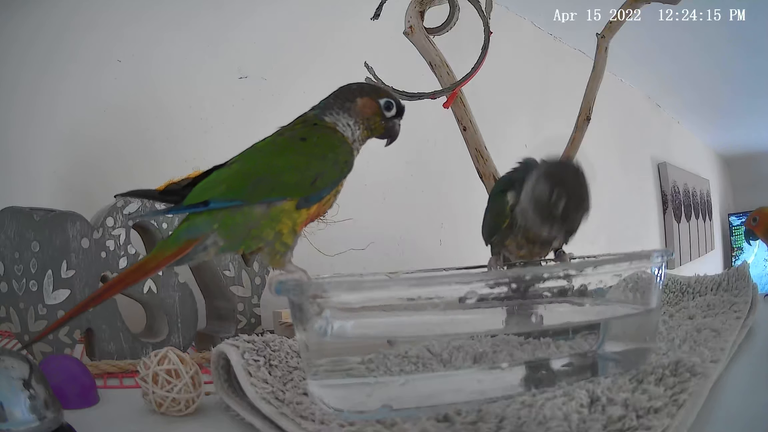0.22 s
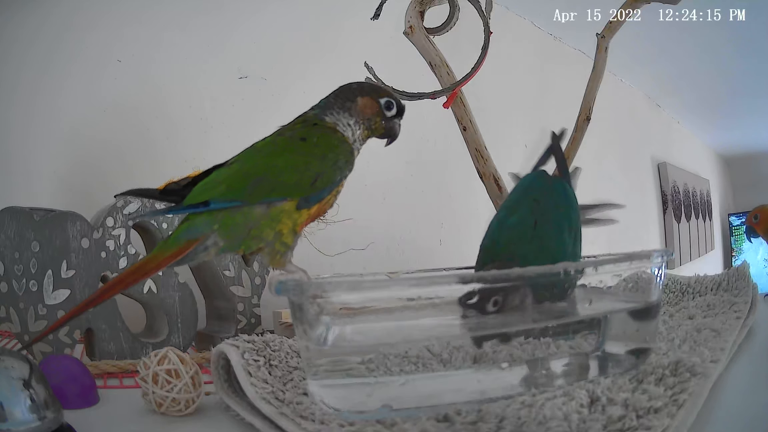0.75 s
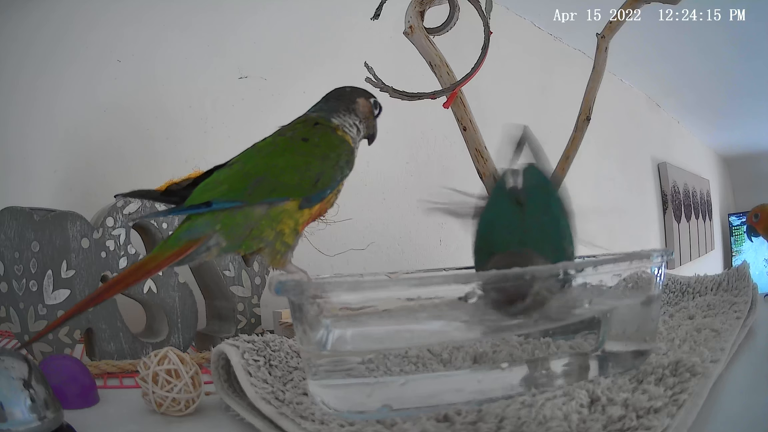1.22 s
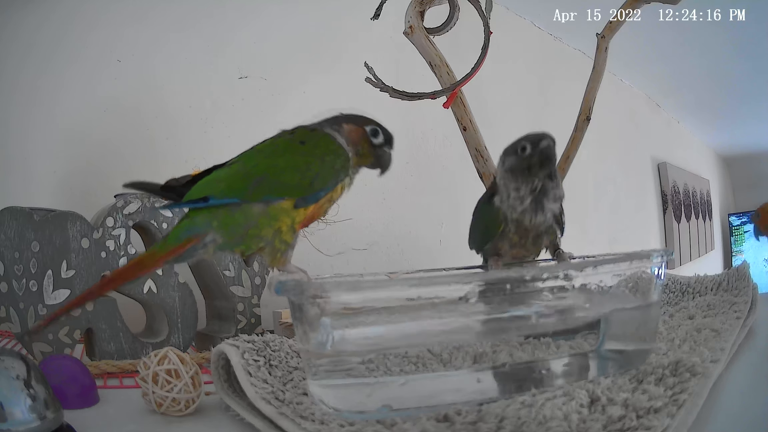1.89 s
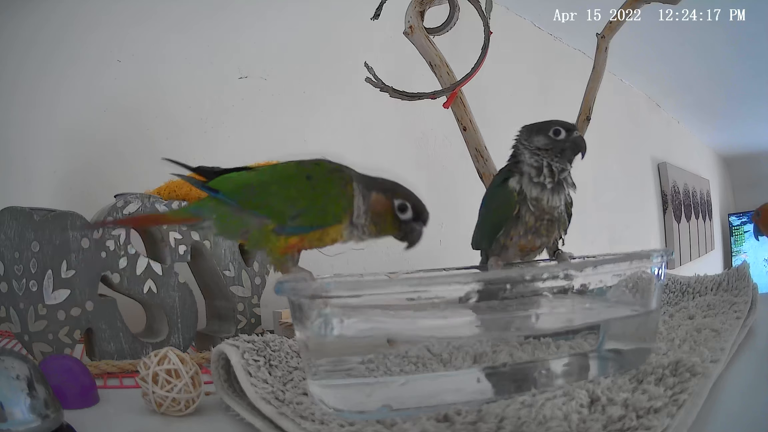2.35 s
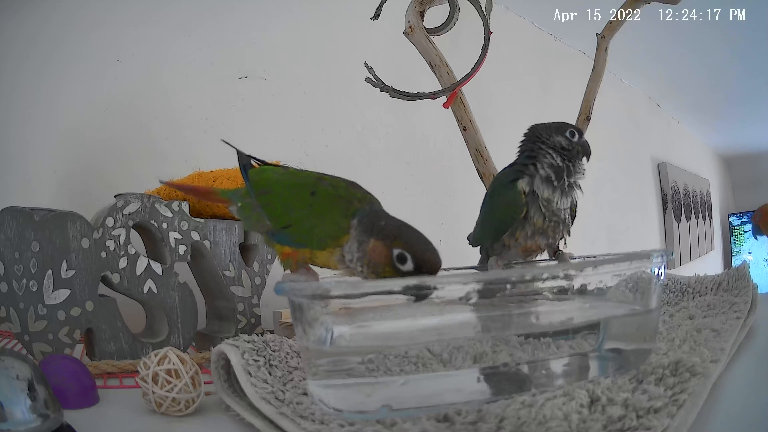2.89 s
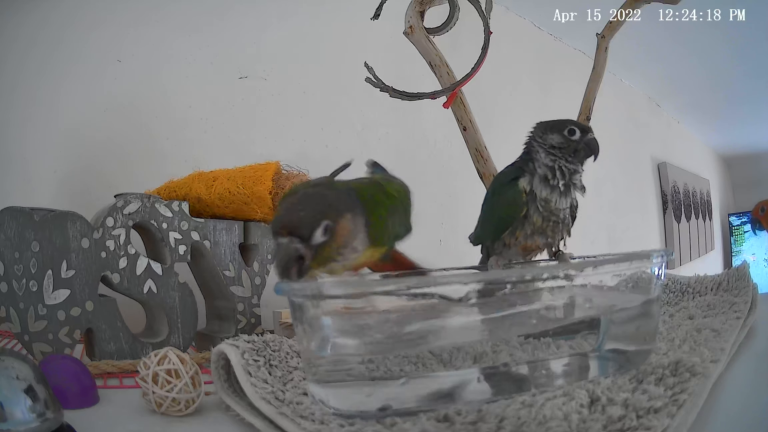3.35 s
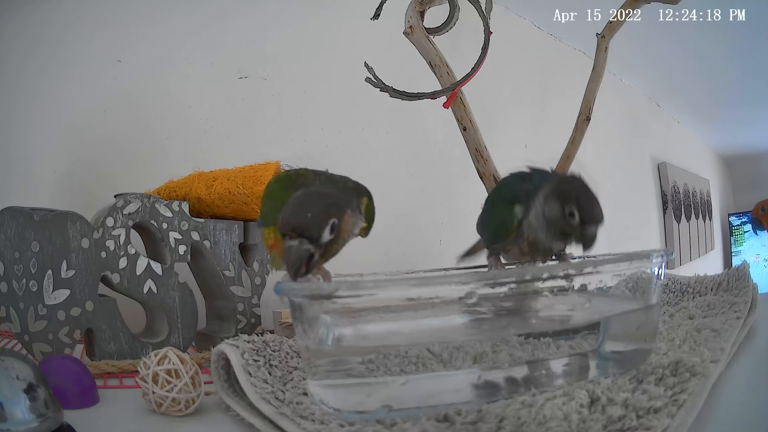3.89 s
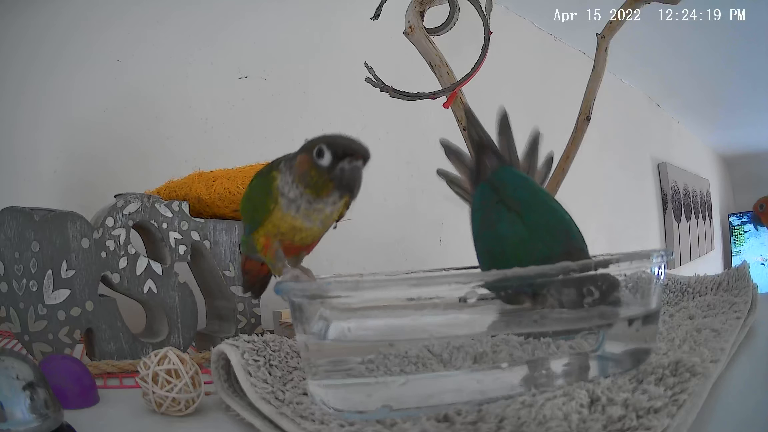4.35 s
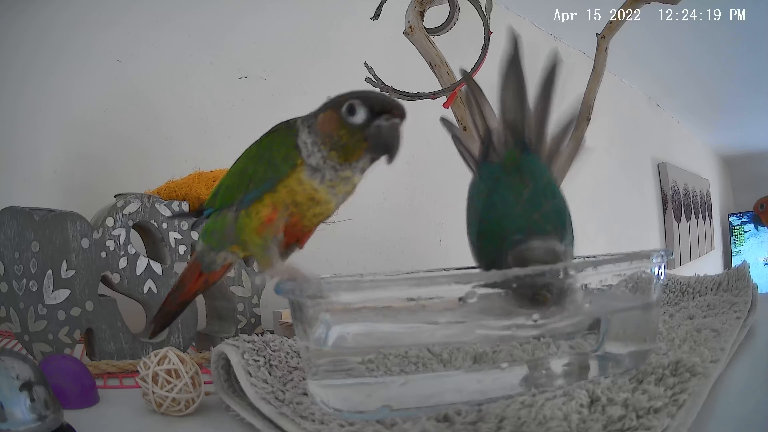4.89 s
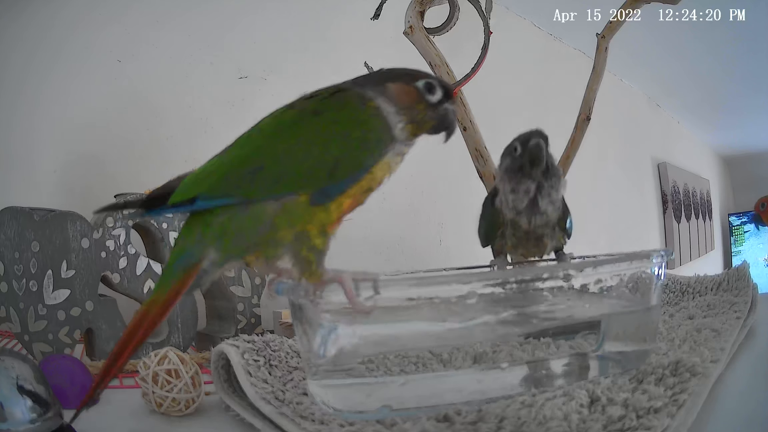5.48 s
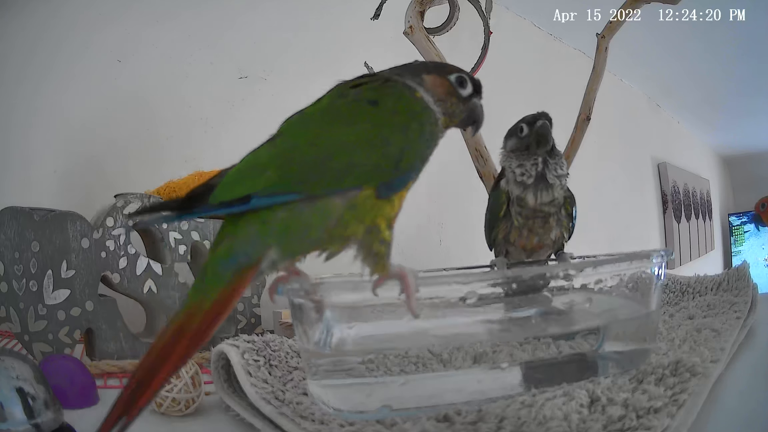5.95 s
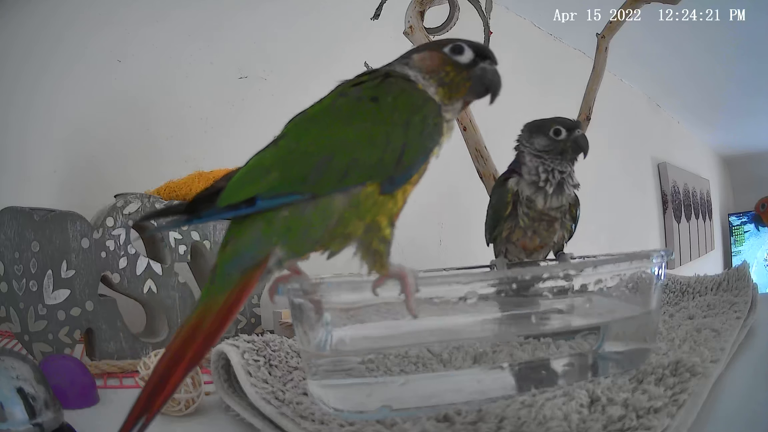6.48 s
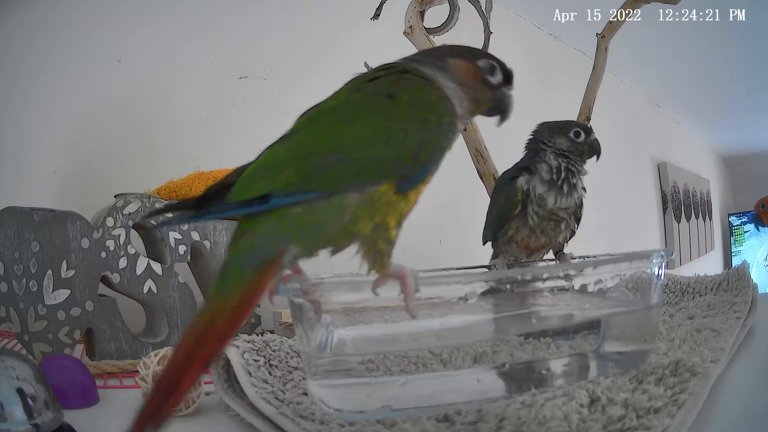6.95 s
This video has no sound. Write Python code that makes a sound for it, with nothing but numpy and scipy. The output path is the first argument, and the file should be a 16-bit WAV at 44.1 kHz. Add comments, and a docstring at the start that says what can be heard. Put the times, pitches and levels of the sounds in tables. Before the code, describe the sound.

Two small parrots bathe in a glass dish: rapid buzzing wing-shake bursts, bubbly water fizz, glassy claw tinks and one short hoarse rasp in a quiet room.

```python
"""A soft hiss and a low rumble lie under a quiet room; then a squelch, and two small parrots bathe in a glass dish.
One shakes its wet head and wings in bursts of about 47 to 60 strokes a second, built from rustling and whistling
noise, and rummages in the water between them: crackle and tiny ringing bubbles. Claws and beaks tink on the dish
as decaying modes. The other bird gives one short hoarse rasp: rough noise in moving throat resonances."""
import sys
import numpy as np
from scipy import signal
from scipy.fft import rfft, irfft, next_fast_len
from scipy.io import wavfile

SR = 44100
rng = np.random.default_rng(int(sys.argv[2]) if len(sys.argv) > 2 else 0)


def dump(signal):
    """Clip the signal to [-1, 1] and save it as 16-bit WAV at the path in sys.argv[1]."""
    limited = np.clip(np.atleast_2d(signal).T, -1, 1)
    pcm = np.round(limited * 32767).astype(np.int16)
    wavfile.write(sys.argv[1], SR, pcm)


N = 317961
TIME = np.arange(N) / SR
STROKE_TIME = np.arange(4096) / SR - .02  # seconds; 0 is the middle of the stroke
MIC_TOP_HZ, CUTOFF_HZ = 6620, 16000

# bright spectrum of fine water fizz, also of a claw's skid: pitch_hz [Hz], relative level_db [dB]
FIZZ = [(2000, -18), (3200, -7.5), (4200, 1), (5500, 7), (6300, -2.5), (6700, -8)]


def from_db(db):
    """Decibels to gain."""
    return 10 ** (np.asarray(db) / 20)


def rms_one(x):
    """Scale to unit rms."""
    return x / np.sqrt(np.mean(x ** 2) + 1e-20)


def add(out, start_s, sound):
    """Mix a sound in at a time."""
    i = int(start_s * SR)
    out[i:i + len(sound)] += sound[:N - i]


def cut(x, hz, kind, order=2):
    """Butterworth filter."""
    return signal.sosfilt(signal.butter(order, hz, kind, fs=SR, output="sos"), x)


def shaped(x, gain_at):
    """Colour a steady sound by a gain over frequency, with nothing above the microphone's range; rms 1."""
    size = next_fast_len(len(x))
    hz = np.maximum(np.arange(size // 2 + 1) * SR / size, 1)
    spectrum = rfft(x, size) * gain_at(hz) * (hz < MIC_TOP_HZ + 200)
    return rms_one(irfft(spectrum, size)[:len(x)])


def coloured(x, points):
    """Colour a steady sound by a spectrum drawn through points; rms 1."""
    at, level = np.transpose(points)
    return shaped(x, lambda hz: from_db(np.interp(np.log(hz), np.log(at), level)))


def resonance(hz, centre, width):
    """Complex response of one resonance, 1 on top."""
    return 1 / (1 + 1j * (hz ** 2 - centre ** 2) / (hz * width))


def crackle(size, per_s, spread_db, smooth):
    """Tiny droplet and barb clicks of uneven size over a smooth hiss."""
    hits = rng.random(size) < per_s / SR
    signs = rng.choice([-1, 1], size)
    strength = from_db(spread_db * np.minimum(rng.exponential(1, size), 4))
    return rms_one(rms_one(hits * signs * strength) + smooth * rng.standard_normal(size))


def swell(t, length, tail_db, tail_s):
    """A rounded push centred on t = 0, then a tail that dies away."""
    push = np.exp(-np.abs(2 * t / length) ** 3)
    tail = from_db(tail_db) * np.exp(-np.abs(t) / np.where(t > 0, tail_s, length / 2))
    return np.hypot(push, tail)


def burst(carrier, envelope, length):
    """Shape a carrier so that it has unit power over the given length."""
    sound = carrier * envelope
    return sound * np.sqrt(length * SR / np.sum(sound ** 2))


def whistle(size, centre_hz, width_hz, steady):
    """Noise in a narrow resonance, its strength partly evened out."""
    # the resonance is applied twice, which narrows it, so each is made wider
    tone = shaped(rng.standard_normal(size), lambda hz: resonance(hz, centre_hz, 1.3 * width_hz) ** 2)
    strength = np.abs(signal.hilbert(tone))
    return rms_one(tone / (strength + 0.6) ** steady)


def background():
    """Steady coloured hiss and a low noise rumble whose level wanders."""
    # spectrum of the hiss: pitch_hz [Hz], relative level_db [dB]
    hiss_spectrum = [(8.8, -41.5), (15, -12), (54, -3), (81, -15), (154, -13.5), (198, -18.5), (263, -20),
                     (314, -20.5), (538, -23), (611, -26.5), (677, -26), (1220, -27.5), (1500, -29.5),
                     (4970, -31), (6760, -32.5), (8790, -60.5), (14900, -120)]
    # level of the rumble before a 0.5 dB lift: time_s [s], level_db [dB]
    rumble_curve = [(0.0, -66.5), (1.06, -64.5), (1.2, -52), (1.64, -58.5), (1.82, -51), (2.4, -66.5),
                    (5.43, -56.5), (5.52, -65.5), (6.19, -54), (6.42, -68), (6.94, -55.5), (7.2, -57.5)]
    rumble_spectrum = [(10, 0.5), (28, -1), (50, -4), (70, -18.5), (120, -28.0), (400, -59)]
    s, level_db = np.transpose(rumble_curve)
    rumble_level = from_db(np.interp(TIME, s, level_db) + 0.5)
    rumble = coloured(rng.standard_normal(N), rumble_spectrum)
    hiss = coloured(rng.standard_normal(N), hiss_spectrum)
    return from_db(-66) * hiss + rumble_level * rumble


def squelches_and_rings():
    """Short pitched squirts from wet plumage, and faint rings of the glass dish near 1.2 kHz, all of narrow noise."""
    # middle_s [s], length_s [s], level_db [dB], pitch_hz [Hz], nominal width_hz [Hz]
    pitched_rows = [(.485, 0.049, -56, 5040, 197), (0.626, 0.0075, -43, 1050, 400),
                    (0.641, 0.0082, -40.5, 1120, 298), (1.393, 0.014, -48, 1410, 248),
                    (1.435, .087, -56, 1220, 198), (1.474, 0.023, -51, 3300, 400),
                    (1.825, 0.027, -39.5, 4770, 700), (1.88, 0.0087, -42.5, 1020, 296),
                    (2.078, 0.034, -53, 985, 400), (4.412, 0.077, -38, 3050, 340),
                    (4.526, 0.053, -52, 3130, 500), (4.556, 0.049, -62, 2220, 294),
                    (4.981, 0.12, -53.5, 1240, 25.1), (5.025, .0082, -41.5, 3680, 503),
                    (5.251, 0.0066, -36.5, 3860, 497), (5.343, 0.013, -41, 5380, 406),
                    (7.1, 0.064, -56.5, 4060, 501)]
    out, t = np.zeros(N), np.arange(8192) / SR - .07
    for s, length, level_db, hz, width_hz in pitched_rows:
        tone = whistle(len(t), hz, width_hz, steady=0.27)
        envelope = swell(t, length, tail_db=-10.5, tail_s=0.0092)
        add(out, s + t[0], from_db(level_db) * burst(tone, envelope, length))
    return out


def shakes():
    """After a wind-up the strokes hold their force, then tire and slow; swish and rustle fade at their own rates."""
    # one shake a row: first_full_stroke_s [s], period_s [s], strokes [count], strokes_until_tired [count],
    # stroke_length_s [s], swish_db [dB], swish_fade_db [dB], swish_hz [Hz], nominal swish_width_hz [Hz],
    # rustle_db [dB], rustle_fade_db [dB]; fades are per unit of tiredness
    shake_rows = [(0.648, .0206, 7, 1.11, .0115, -18.5, 6, 5170, 701, -24, 3.5),
                  (1.1237, .0191, 7, 2.65, 0.011, -28, 6, 5300, 900, -33.5, 2.5),
                  (1.8998, .0207, 7, 2, 0.0091, -8.5, 8.5, 5328, 260, -24.5, 3.6),
                  (2.1025, .0168, 4, 2, .009, -9, 13.5, 5090, 1115, -26.5, 5.3),
                  (4.0227, .0206, 6, 2.6, 0.015, -48.5, 11.5, 5600, 1100, -42.5, 3.5),
                  (4.2455, .019, 6, 0.77, 0.0093, -16, 8, 5095, 748, -29, 3),
                  (4.8378, .0205, 5, 2, .008, -18, 14, 4930, 450, -26, 5),
                  (5.5087, .0211, 7, 1.77, .0098, -9.5, 8.5, 5290, 200, -26, 5),
                  (6.727, .0203, 7, 0.8, .008, -14.5, 7.5, 4980, 400, -23, 3.5)]
    # the bird's posture in each shake, same order: echo_delay_s [s], echo_share [0-1, held to 0.8],
    # tilt [dB per octave], hollow_hz [Hz], hollow_db [dB re rustle], ridge_hz [Hz], full-force ridge_db [dB]
    postures = [(0.001106, 0.81, 1.5, 1683, -16, 3610, 19.5), (0.001853, 0.26, 5, 1570, -8, 3170, 8),
                (0.0007, 1, 4, 2100, -17.5, 4600, 10.5), (0.0014, 0.61, 1.5, 3300, -14.5, 3700, 24.5),
                (0.000873, 0.47, 0, 1200, -12.5, 2070, 14.5), (0.00083, 0.193, 1.5, 1700, -8.5, 3300, 12.5),
                (0.00125, 0.69, 6, 1673, -7.5, 3290, 8.5), (0.000997, 0.49, 4, 1775, -15.5, 3710, 19.5),
                (.0006, 0.51, 4, 1666, -6, 3280, 12.5)]
    slowing = 0.0029  # each stroke comes later by this share of a period, times its number squared
    tiring_power = 0.83  # the fade flattens as the strokes go on
    blurring = 0.065  # tired strokes drag on longer by this share
    wind_up_swish_db, wind_up_rustle_db = -28.5, -19.5  # re a full stroke
    spread_db, pitch_spread = 0.35, 0.02  # chance from stroke to stroke
    out = np.zeros(N)
    for shake, posture in zip(shake_rows, postures):
        (start, period, count, hold, length, swish_db, swish_fade_db,
         swish_hz, width_hz, rustle_db, rustle_fade_db) = shake
        for k in range(-1, count):  # -1 is the wind-up
            tired = max(k - hold, 0) ** tiring_power
            swish_change = wind_up_swish_db if k < 0 else -swish_fade_db * tired
            rustle_change = wind_up_rustle_db if k < 0 else -rustle_fade_db * tired
            chance_db, detune = rng.standard_normal(2) * [spread_db, pitch_spread]
            sound = stroke(length * (1 + blurring * tired), rustle_db + rustle_change + chance_db,
                           swish_db + swish_change + chance_db, swish_hz * (1 + detune), width_hz, posture)
            add(out, start + period * (k + slowing * k ** 2) + STROKE_TIME[0], sound)
    return out


def stroke(length, rustle_db, swish_db, swish_hz, width_hz, posture):
    """One stroke flings a broad wet rustle, a narrow feather-tip swish and drops, and rings the hollow underneath."""
    delay, echo, tilt_db, hollow_hz, hollow_db, ridge_hz, ridge_db = posture
    t = STROKE_TIME

    def comb(hz):
        """Sound bounces between bird and dish."""
        bounce = np.clip(echo, 0, .8) * np.exp(-2j * np.pi * hz * delay)
        return (1 + bounce) / (1 - .3 * bounce)

    def colour(hz):
        """The rustle fills the middle band; the feather ridge lifts it."""
        force = np.clip(from_db(rustle_db + 28.5), .3, 1)  # hard strokes spread the feathers most
        ridge = 1 + force * (from_db(ridge_db) - 1) * np.abs(resonance(hz, ridge_hz, 450)) ** 2
        band = 1 / np.sqrt((1 + (800 / hz) ** 8) * (1 + (hz / 4900) ** 14)) + 0.087
        tilt = from_db(tilt_db * np.log2(np.clip(hz, 500, 3500) / 2000))
        return comb(hz) * ridge * band * tilt

    def skirt_colour(hz):
        """A wide resonance around the swish, with the same bounce."""
        return comb(hz) * resonance(hz, swish_hz, 2200) ** 3

    rustle = shaped(crackle(len(t), per_s=4600, spread_db=5, smooth=0.44), colour)
    hollow = whistle(len(t), hollow_hz * (1 + rng.normal(0, .03)), 190, steady=.8)
    # the swish is a whistling core with a wide skirt of spray
    skirt = shaped(crackle(len(t), per_s=920, spread_db=2, smooth=0.42), skirt_colour)
    swish = whistle(len(t), swish_hz, width_hz, steady=0.6) + from_db(-9) * skirt

    rustle_push = swell(t, length, tail_db=-11, tail_s=.009)
    hollow_push = swell(t, 1.25 * length, tail_db=-10, tail_s=.011)
    swish_push = swell(t, length, tail_db=-20, tail_s=0.012)
    sound = from_db(rustle_db - 1.5) * burst(rustle, rustle_push, length)
    sound += from_db(rustle_db + hollow_db + 1.5) * burst(hollow, hollow_push, length)
    sound += from_db(rustle_db - 11) * drops(length)
    return sound + from_db(swish_db - 1.5) * burst(swish, swish_push, length)


def drops(length):
    """A stroke throws a few drops; each lands and rings briefly at its own pitch. Unit power over the stroke."""
    count, low_hz, high_hz = 7, 900, 4990
    ring_cycles, mean_flight_s = 70, .005  # cycles to fall by 60 dB
    sound = np.zeros(len(STROKE_TIME))
    for size, flight, strength in rng.random((count, 3)):
        hz = low_hz * (high_hz / low_hz) ** np.sqrt(size)
        flight_s = -mean_flight_s * np.log(1 - flight)
        age = np.maximum(STROKE_TIME + length / 2 - flight_s, 0)
        sound += strength * hz * np.sin(2 * np.pi * hz * age) * from_db(-60 * age * hz / ring_cycles)
    return burst(cut(sound, low_hz, "high"), 1, length)


def rummage():
    """Wet feathers stir the water: fine fizz above a lower slosh, both of crackle and bubbles."""
    # one curve per bout: time_s [s], fizz_db [dB before a 2 dB cut], slosh_db [dB before a 3 dB cut]
    bouts = [
        [(0.83, -77, -76), (0.908, -57.5, -73), (0.958, -90, -96), (0.998, -58, -76), (1.03, -68, -82),
         (1.048, -49, -73.5), (1.084, -51.5, -72), (1.1, -56, -42)],
        [(1.243, -54, -44), (1.251, -54, -56), (1.355, -61.5, -71), (1.371, -53, -83), (1.397, -58, -72),
         (1.523, -49.5, -55.5), (1.641, -62, -75), (1.66, -55, -60)],
        [(4.345, -51, -51), (4.371, -46, -42.5), (4.391, -39, -53), (4.459, -47, -70), (4.469, -38.5, -70),
         (4.499, -52, -82), (4.575, -58.5, -62), (4.63, -76, -80)],
        [(4.958, -43.5, -46.5), (5.03, -46, -60), (5.052, -57, -75), (5.086, -41, -68), (5.096, -50.5, -71),
         (5.24, -47, -56), (5.382, -48.5, -67), (5.46, -68, -85.5)],
        [(6.03, -90, -84), (6.1, -51, -59.5), (6.164, -61, -65), (6.178, -49, -61.5), (6.222, -73, -68),
         (6.248, -66, -75), (6.29, -84, -83), (6.31, -81, -79)],
        [(6.865, -77, -62), (6.925, -54, -64), (6.943, -72, -76), (6.985, -39.5, -48.5), (7.021, -60.5, -65),
         (7.113, -54, -70), (7.143, -59, -77), (7.2, -66.5, -67)],
    ]
    # spectrum of the slosh: pitch_hz [Hz], relative level_db [dB]
    slosh_spectrum = [(500, -10.5), (1150, -4), (1900, -2), (3000, 4), (4500, -26.5)]
    fizz_level, slosh_level = np.zeros((2, N))
    for rows in bouts:
        s, fizz_db, slosh_db = np.transpose(rows)
        fizz_level += from_db(np.interp(TIME, s, fizz_db, left=-120, right=-120))
        slosh_level += from_db(np.interp(TIME, s, slosh_db, left=-120, right=-120))
    patter = crackle(N, per_s=1200, spread_db=2.0, smooth=0.85)
    fizz = coloured(.65 * bubbles(2500, 6700, per_s=1800) + patter, FIZZ)
    splash = crackle(N, per_s=900, spread_db=3, smooth=1)
    slosh = coloured(.6 * bubbles(900, 3200, per_s=500) + splash, slosh_spectrum)
    return from_db(-2) * fizz_level * fizz + from_db(-3) * slosh_level * slosh


def bubbles(low_hz, high_hz, per_s, cycles=40, count=24):
    """Tiny bubbles pop at random, each ringing for some cycles at one of a set of pitches, as its size gives."""
    out = np.zeros(N)
    for hz in np.geomspace(low_hz, high_hz, count):
        # a two-pole resonator that falls by 60 dB over the given cycles
        r, w = from_db(-60 * hz / (cycles * SR)), 2 * np.pi * hz / SR
        pops = (rng.random(N) < per_s / count / SR) * rng.standard_normal(N)
        out += signal.lfilter([np.sin(w)], [1, -2 * r * np.cos(w), r * r], pops + 1e-18)
    return rms_one(out)


def dish():
    """A claw or beak skids for a moment and rings the dish's modes, each varying by chance with the landing spot."""
    # start_s [s], low_modes_db [dB], high_modes_db [dB], both before fixed lifts
    taps = [(1.364, -69, -50.5), (1.528, -55.5, -56), (1.678, -50, -39.5), (1.763, -48, -36),
            (1.846, -46, -37.5), (2.33, -72, -51.5), (2.469, -55, -45.5), (2.773, -57.5, -54),
            (3.254, -73.5, -57.5), (3.538, -71, -55), (3.558, -63.5, -51.5), (4.016, -61.5, -55),
            (4.464, -54, -47.5), (4.647, -71, -57), (4.772, -67.5, -49), (5.728, -70.5, -66),
            (5.87, -74, -68)]
    # modes of the dish: pitch_hz [Hz], relative level_db [dB], t60_s [s to fall by 60 dB]
    modes = [(1240.6, -10, 0.14), (1773, -2.5, 0.058), (2220, -3.5, .049), (2707, -12.5, .17),
             (3370, -8.5, 0.13), (3674, -12, .17), (4320, 4.5, .11), (4310, 1, 0.089), (4790, -4, 0.11),
             (4910, -3.5, .09), (5670, -5.5, 0.13), (6030, -4, .08), (6180, 3.5, 0.065), (6470, -5, .08)]
    high_modes_hz, spread_db, attack_s = 4520, 5.5, 0.0099
    out, t = np.zeros(N), np.arange(SR // 3) / SR
    for s, low_db, high_db in taps:
        skid = from_db(high_db + 9) * coloured(crackle(len(t), per_s=1000, spread_db=2, smooth=0.56), FIZZ)
        sound = skid * np.exp(-t / 0.007)
        for hz, level_db, t60 in modes:
            tap_db = low_db if hz < high_modes_hz else high_db
            strength = from_db(tap_db + level_db + 10.5 + spread_db * rng.standard_normal())
            sound += strength * np.sin(2 * np.pi * (hz * t + rng.random())) * from_db(-60 * t / t60)
        add(out, s, sound * (1 - np.exp(-t / attack_s)))
    return out


def extra_strokes():
    """Extra strokes: a strong wind-up and late strokes of shakes, and a few lone flicks, all in one posture."""
    # middle_s [s], length_s [s], rustle_db [dB], swish_db [dB], swish_hz [Hz]
    extra_rows = [(2.085, 0.013, -40, -24, 5198), (2.1762, 0.0032, -39.5, -11.5, 5160),
                  (2.206, 0.059, -56, -47, 5030), (3.429, .005, -29.5, -32, 5114),
                  (4.395, .011, -51, -41, 5100), (4.947, 0.0071, -27.5, -31, 4820),
                  (5.085, .0087, -62, -34, 5170), (5.167, 0.013, -65, -38, 5220),
                  (5.221, 0.017, -45.5, -42, 5250)]
    # echo_delay_s [s], echo_share [held to 0-0.8], tilt [dB per octave], hollow_hz [Hz],
    # hollow_db [dB re rustle], ridge_hz [Hz], full-force ridge_db [dB]
    # (the echo share is held at zero here, so there is no bounce)
    extra_posture = (1.56, -0.1, 7, 1671, -13.5, 3198, 6)
    out = np.zeros(N)
    for s, length, rustle_db, swish_db, swish_hz in extra_rows:
        sound = stroke(length, rustle_db, swish_db, swish_hz, 480, extra_posture)
        add(out, s + STROKE_TIME[0], sound)
    return out


def bumps(ring_hz=2245, ring_db=-9, ring_t60=0.0598):
    """The body bumps the dish: a dull noise knock and one ring of the water-loaded glass."""
    # start_s [s], level_db [dB, to which the knock and ring levels are relative]
    bump_rows = [(2.123, -14.5), (2.1339, -9.5)]
    out, t = np.zeros(N), np.arange(SR // 5) / SR
    for s, level_db in bump_rows:
        knock = rms_one(cut(rng.standard_normal(len(t)), [130, 950], "band")) * np.exp(-t / .0016)
        ring = np.sin(2 * np.pi * ring_hz * t) * from_db(ring_db - 60 * t / ring_t60)
        add(out, s, from_db(level_db) * (from_db(-13.0) * knock + ring))
    return out


def rasp():
    """Rough airflow rings the throat; the two lowest resonances move with tongue and beak."""
    # time_s [s], level_db [dB], first_resonance_hz [Hz], second_resonance_hz [Hz]
    rasp_curve = [(3.291, -74, 618, 1317), (3.31, -36, 673, 1443), (3.333, -28, 928, 1780),
                  (3.354, -26.5, 889, 1759), (3.395, -30, 813, 1504), (3.429, -26.5, 878, 1759),
                  (3.438, -38.5, 878, 1830), (3.485, -55, 862, 1562)]
    # throat resonances before they move: pitch_hz [Hz], nominal width_hz [Hz], relative gain_db [dB]
    throat = [(842, 76, -1.5), (1650, 210, -4), (2677, 49, -6), (3520, 52, -8), (4480, 64, -8),
              (5050, 110, -8.5), (5480, 69, -9.5)]
    # spectrum of the breath: pitch_hz [Hz], relative level_db [dB]
    breath_spectrum = [(380, -26), (720, 1.5), (1150, -13.5), (2200, -6.5), (3000, 1), (3850, 3.5),
                       (4220, -15), (4700, 2.5), (5900, 2.5), (6600, -5)]
    upper_follows = .6  # share of the second resonance's movement
    s, level_db, first_hz, second_hz = np.transpose(rasp_curve)
    t = np.arange(s[0], s[-1], 1 / SR)
    breath = coloured(crackle(len(t), per_s=5000, spread_db=2, smooth=1), breath_spectrum)
    sound = from_db(-3) * breath
    moving = [np.interp(t, s, first_hz), np.interp(t, s, second_hz)]
    for k, (hz, width_hz, gain_db) in enumerate(throat):
        if k < len(moving):
            shift = moving[k] - hz
        else:
            shift = upper_follows * (moving[1] - throat[1][0])
        # shift the whole resonance along its pitch curve
        ringing = signal.hilbert(whistle(len(t), hz, width_hz, steady=0.58))
        sound += from_db(gain_db) * np.real(ringing * np.exp(2j * np.pi * np.cumsum(shift) / SR))
    out = np.zeros(N)
    add(out, s[0], rms_one(sound) * from_db(np.interp(t, s, level_db)))
    return out


def room(x, t60=0.023, wet_db=-19):
    """A short diffuse tail from the room: decaying noise after a 3 ms gap."""
    t = np.arange(SR // 3) / SR
    tail = rng.standard_normal(len(t)) * from_db(-60 * t / t60) * (t > .003)
    return x + from_db(wet_db) * signal.fftconvolve(x, tail / np.linalg.norm(tail))[:N]


def scene():
    """Birds, water and dish in the room, over its hiss and rumble."""
    strokes = shakes() + extra_strokes()
    bath = strokes + rummage() + squelches_and_rings() + rasp() + dish() + bumps()
    return (room(bath) + background())[None]


def record(dry):
    """A narrow-band microphone that clips the hardest strokes and adds faint noise; the top is cut."""
    narrow = signal.sosfilt(signal.ellip(10, .3, 80, MIC_TOP_HZ, fs=SR, output="sos"), dry)
    loud = np.clip(narrow, -.76, .76) + from_db(-101) * rng.standard_normal(dry.shape)
    return signal.sosfilt(signal.cheby2(12, 70, CUTOFF_HZ + 1000, fs=SR, output="sos"), loud)


dry = scene()
out = record(dry)
dump(out)
```